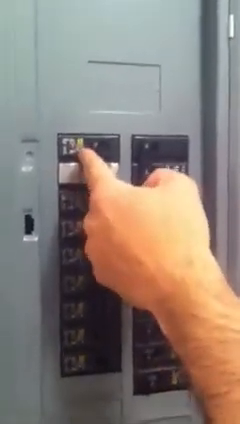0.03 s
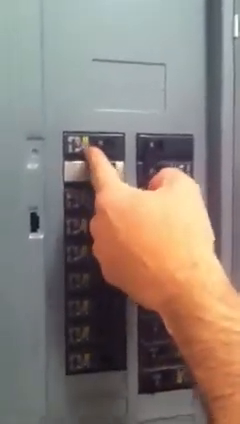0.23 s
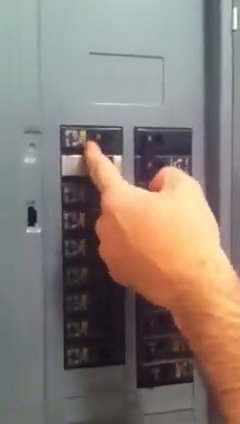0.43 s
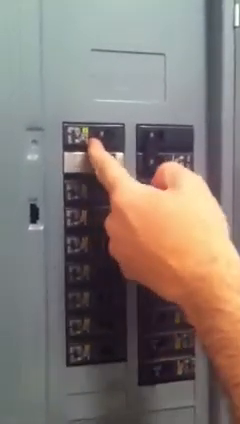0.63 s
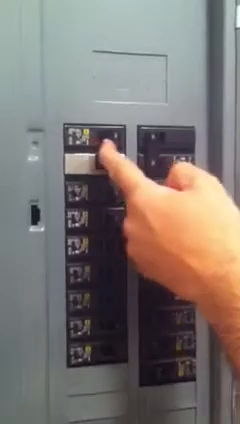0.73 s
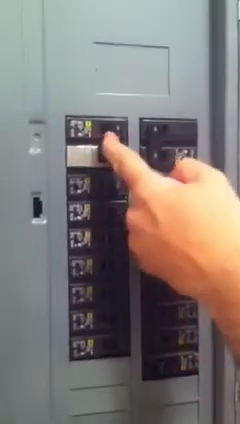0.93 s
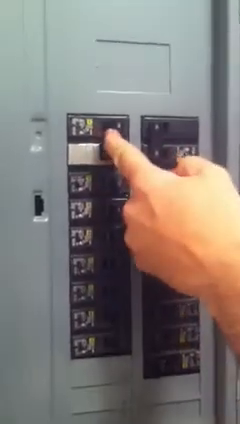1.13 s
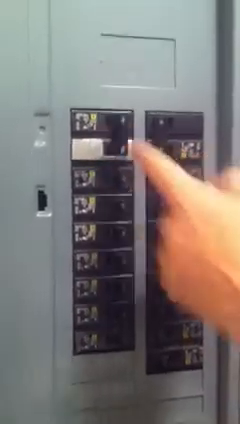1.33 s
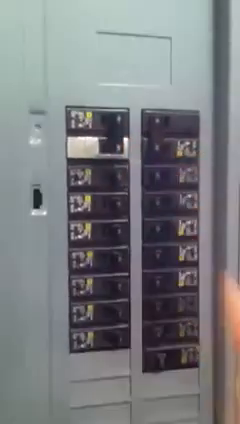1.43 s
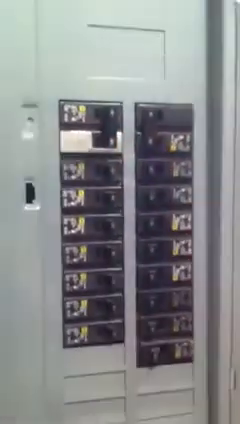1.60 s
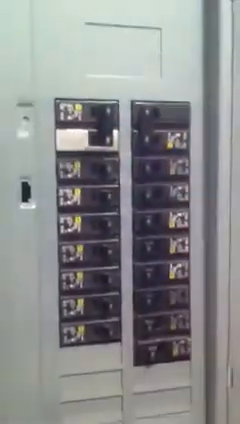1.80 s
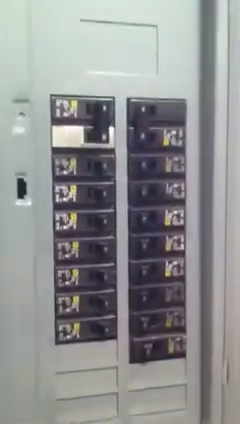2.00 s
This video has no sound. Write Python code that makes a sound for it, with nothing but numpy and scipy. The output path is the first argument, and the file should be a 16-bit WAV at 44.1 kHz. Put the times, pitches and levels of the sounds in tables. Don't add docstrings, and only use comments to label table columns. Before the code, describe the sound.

Sharp breaker clack at about 0.77 seconds, several contacts packed into one crack, followed by brief metallic panel ring and short room echo. Soft hum and hiss throughout, with tiny ticks later, recorded close indoors.

```python
import sys
import numpy as np
from scipy import signal
from scipy.fft import rfft, irfft, next_fast_len
from scipy.io import wavfile
from scipy.ndimage import uniform_filter1d, map_coordinates

SR = 44100
rng = np.random.default_rng(int(sys.argv[2]) if len(sys.argv) > 2 else 0)


def voltage_ratio(level):
    return 10 ** (np.asarray(level, float) / 20)


def to_wav(s):
    ch = np.atleast_2d(s).T
    pcm = np.round(np.clip(ch, -1, 1) * 32767)
    wavfile.write(sys.argv[1], SR, pcm.astype(np.int16))


N = 90493
SNAP_S = .7707


def unit(x):
    return x / np.sqrt(np.mean(x ** 2) + 1e-20)


def along(points, hz):
    f, v = np.transpose(points)
    return np.interp(np.log(hz + 1), np.log(f + 1), v)


def filtered(x, response):
    m = next_fast_len(len(x) + 8192)
    return irfft(rfft(x, m) * response(np.fft.rfftfreq(m, 1 / SR)), m)[:len(x)]


def peak(f, hz, width_hz):
    return 1j * f * width_hz / (hz * hz - f * f + 1j * f * width_hz)


def noise(spectrum):
    return unit(filtered(rng.standard_normal(N), lambda hz: voltage_ratio(along(spectrum, hz))))


def since(s):
    return np.maximum(np.arange(N) / SR - s, 0)


def dying(t, t60, attack):
    return voltage_ratio(-60 * t / t60) * (1 - np.exp(-t / attack))


# pitch_hz, level_db
HUM = [(70, -38.5), (150, -7.5), (175, -12), (220, 2), (285, -17), (370, -9.5), (480, -19.5), (1500, -37)]
# pitch_hz, level_db
AIR = [(300, -14), (600, 27.5), (1500, 23.5), (2200, 7), (4000, -75)]
# pitch_hz, level_db
HISS = [(40, -3.5), (300, -4), (1500, 5), (5000, 1), (10000, -3), (16000, -4)]


def background():
    hum_db, air_db, hiss_db = -60.5, -73.5, -70
    fade_db_per_s = -1.5
    house = voltage_ratio(hum_db) * noise(HUM) + voltage_ratio(air_db) * noise(AIR)
    return voltage_ratio(fade_db_per_s * since(0)) * house + voltage_ratio(hiss_db) * noise(HISS)


def ducked(x):
    duck_db, recover_s = -2, .5
    t = since(SNAP_S)
    return x * voltage_ratio(duck_db * (t > 0) * np.exp(-(t / recover_s) ** 4))


# pitch_hz, t60_s
ROOM = [(120, .4), (500, 0.28), (1500, .22), (4000, 0.23), (8000, 0.18), (15000, 0.16)]
# pitch_hz, level_db
ROOM_COLOUR = [(100, -57), (200, -16.5), (400, -14), (1600, -18), (3340, -15), (6000, -13.5),
               (10000, -11.5), (16000, -20)]


def room():
    level_db, fill_s = -17.5, 0.00395
    late_db, late_longer = -17, 2.2
    low_fill_cycles = 5
    hz, t, z = signal.stft(noise(ROOM_COLOUR), SR, nperseg=256)
    t60 = along(ROOM, hz)[:, None]
    near = voltage_ratio(-60 * t / t60)
    far = voltage_ratio(late_db - 60 * t / t60 / late_longer)
    build = 1 - np.exp(-(t + .002) * (hz[:, None] + 50) / low_fill_cycles)
    tail = signal.istft(z * (near + far) * build, SR, nperseg=256)[1][:N]
    tail = filtered(tail, lambda f: f ** 4 / (f ** 4 + 110 ** 4))
    tail = np.pad(tail, (round(SNAP_S * SR), 0))[:N]
    return voltage_ratio(level_db) * tail * (1 - np.exp(-since(SNAP_S) / fill_s))


# start_s, level_db, pitch_hz, t60_s
TICKS = [(0.635, -62, 7600, 0.11), (.6648, -56, 8100, 0.078), (0.673, -65, 9200, 0.18),
         (0.742, -58.5, 3420, 0.067), (0.7433, -62.5, 6450, 0.067), (1.3087, -49, 5400, 0.0096),
         (1.3098, -57.5, 8700, 0.026), (1.3092, -68, 2490, .15), (1.3095, -68.5, 11000, 0.018),
         (1.315, -66.5, 523, 0.48), (1.32, -71, 119, 1.7), (1.32, -64.5, 5930, 0.13),
         (1.32, -65.5, 238, 0.58), (1.9, -71.5, 6040, .5), (1.319, -66.5, 860, 0.23),
         (1.838, -67.5, 1518, 0.3), (1.838, -65.5, 800, 0.19), (1.846, -67, 4750, 0.055)]


def ticks():
    out = np.zeros(N)
    for s, db, pitch_hz, t60 in TICKS:
        width_hz = 0.64 * pitch_hz
        burst = filtered(rng.standard_normal(N), lambda f: peak(f, pitch_hz, width_hz) ** 2)
        out += voltage_ratio(db) * dying(since(s), t60, .0002) * unit(burst)
    return out


# pitch_hz, level_db, t60_s
STEEL = [(600, -12, .3), (1140, -9, .3), (1465, -14, .3), (1860, -13, .36), (2330, -14, .3),
         (3278, -9, .25), (4045, -7, .15), (4550, -8, .16), (5163, -9, .2), (5470, -8, .18),
         (5700, -8, .25), (7610, -6, .15), (9555, -12, .18), (12680, -9, .07)]


def steel_cover():
    level_db, attack_s, flutter_hz = -33, .002, 50
    t = since(SNAP_S)
    out = np.zeros(N)
    for hz, db, t60 in STEEL:
        flutter = map_coordinates(rng.normal(1.0, 1, 200), [t * flutter_hz], mode="nearest")
        tone = np.sin(2 * np.pi * (hz * t + rng.random()))
        out += voltage_ratio(level_db + db) * dying(t, t60, attack_s) * flutter * tone
    return out


# pitch_hz, level_db, t60_s, swell_s
BOX = [(120, -50, .5, .006), (172, -34, .33, .02), (236, -19, .15, .022), (268, -39, .4, .03),
       (330, -40, .2, .008), (560, -44, .4, .015), (1850, -26, .04, .003), (1125, -28, .06, .008),
       (45, -50, .05, .003), (80, -62, .5, .004)]


def box_boom():
    t = since(SNAP_S)
    out = np.zeros(N)
    for hz, db, t60, swell in BOX:
        envelope = dying(t, t60, swell) * (1 - np.exp(-t / swell))
        out += voltage_ratio(db) * envelope * np.sin(2 * np.pi * (hz * t + rng.random()))
    return out


# pitch_hz, width_hz, level_db
CASE = [(1800, 350, -10), (3400, 900, -10), (4800, 1200, 1), (5900, 1000, 0), (7700, 1000, -1),
        (9700, 1100, -11), (12400, 1100, 1), (15300, 1600, -8)]


def case_click(push, tilt_db):
    own_db = rng.normal(0, 5.5, len(CASE))

    def response(f):
        total = 0
        for k, (hz, width_hz, db) in enumerate(CASE):
            gain = voltage_ratio(db + own_db[k] + tilt_db * np.log2(hz / 6000))
            total = total + (-1) ** k * gain * peak(f, hz, width_hz) ** 2
        return total

    return filtered(push, response)


# start_s, level_db, brightness_db_per_octave
CONTACTS = [
    (.7681, -26, 0),
    (.7692, -26, 0),
    (.7707, -6, -1),
    (.7712, -11, 0),
    (.7736, -12, -3),
    (.7745, -8, -1),
    (.7751, -7, 1),
    (.7779, -8, 2),
    (.7789, -11, -2),
    (.7862, -14, 0),
]


def mechanism():
    rattle_db, rattle_s = -14, .0002
    t = np.arange(2048) / SR
    out = np.zeros(N)
    for s, db, tilt_db in CONTACTS:
        push = voltage_ratio(rattle_db) * rng.standard_normal(len(t)) * np.exp(-t / rattle_s)
        push[8] += 1
        click = case_click(push, tilt_db)
        out[round(s * SR):][:len(t)] += voltage_ratio(db) * click / np.abs(click).max()
    return out


def scene():
    snap = mechanism()
    panel = steel_cover() + box_boom()
    return (snap + panel + room() + ticks() + ducked(background()))[None]


def band_limit(x):
    return signal.sosfilt(signal.butter(12, 16830, fs=SR, output="sos"), x)


def record(dry):
    top_hz, offset = 15950, -.0001
    dull_hz, dull_db = 4500, -8
    t = np.arange(N) / SR

    def inside(start_s, end_s):
        return uniform_filter1d(1. * ((t > start_s) & (t < end_s)), size=40)

    x = filtered(dry[0], lambda hz: 1 / (1 + (hz / top_hz) ** 200))
    treble = filtered(x, lambda hz: hz > dull_hz)
    x = x - (1 - voltage_ratio(dull_db)) * inside(1.296, 1.306) * treble
    mix = (x + offset) * (1 - inside(.7598, .768))
    return band_limit(mix[None])


dry = scene()
out = record(dry)
to_wav(out)
```